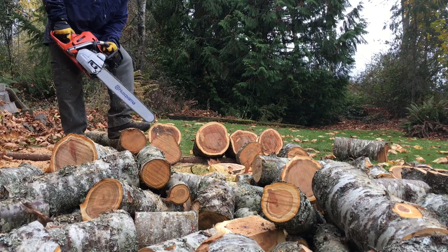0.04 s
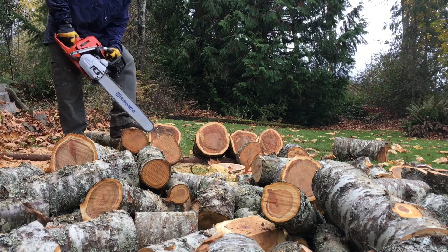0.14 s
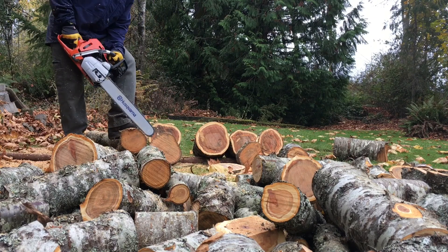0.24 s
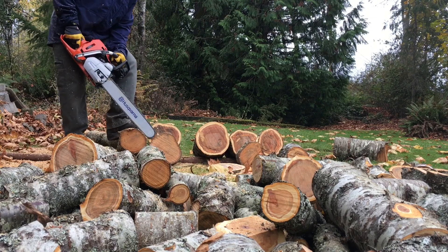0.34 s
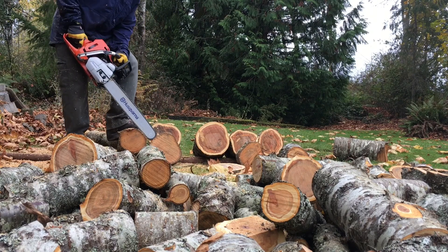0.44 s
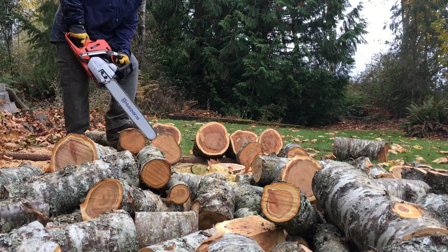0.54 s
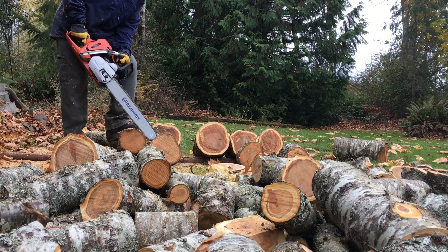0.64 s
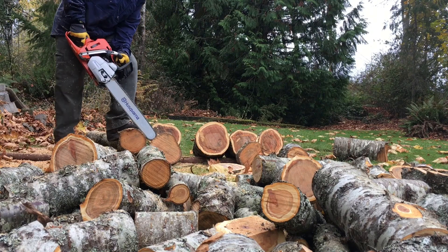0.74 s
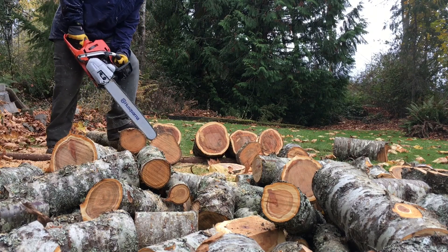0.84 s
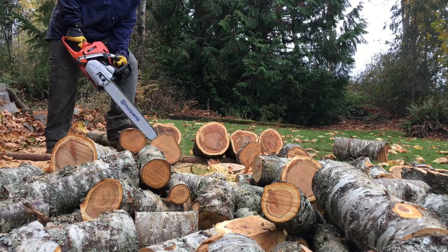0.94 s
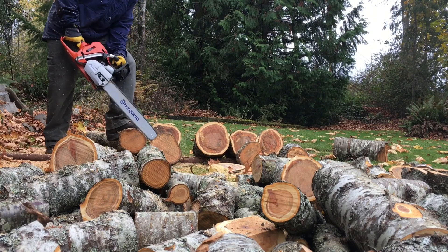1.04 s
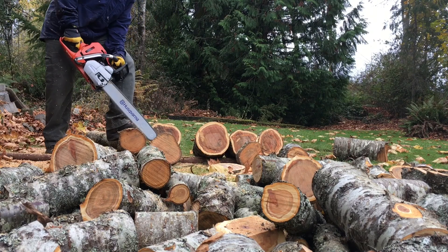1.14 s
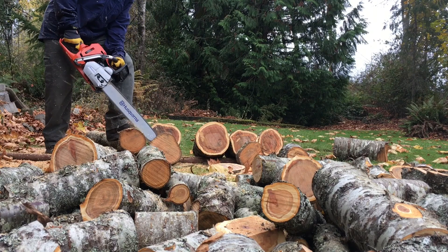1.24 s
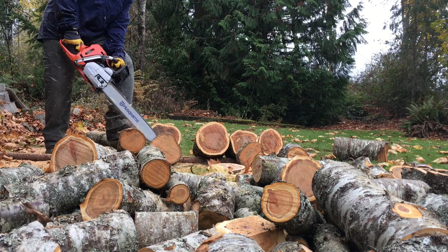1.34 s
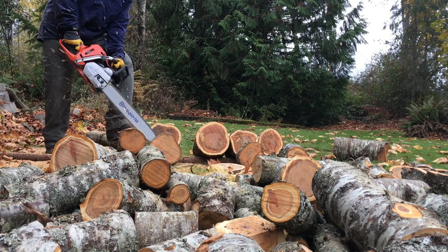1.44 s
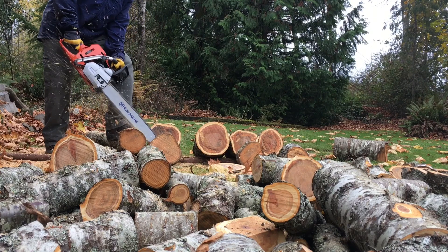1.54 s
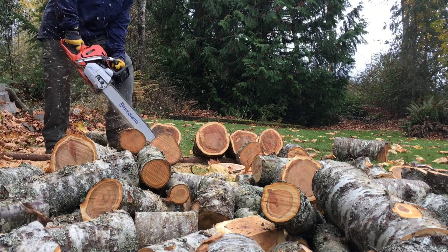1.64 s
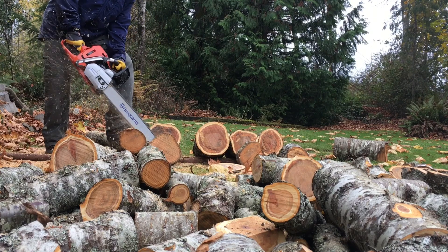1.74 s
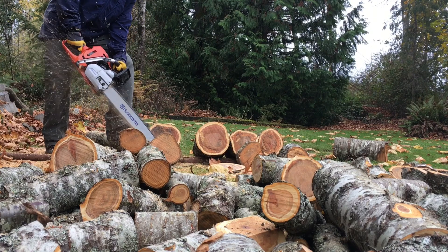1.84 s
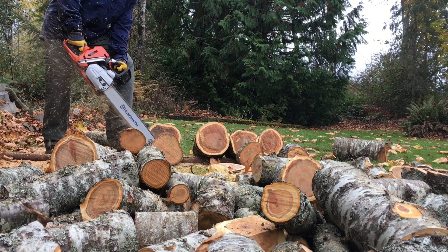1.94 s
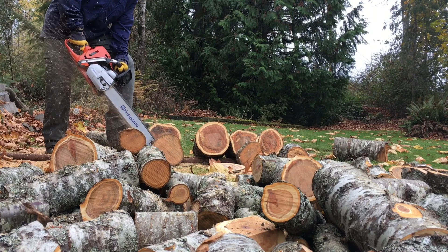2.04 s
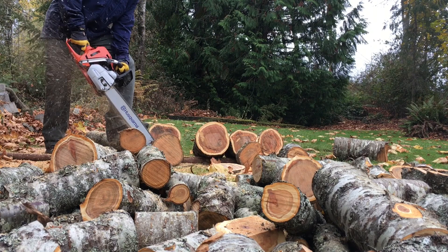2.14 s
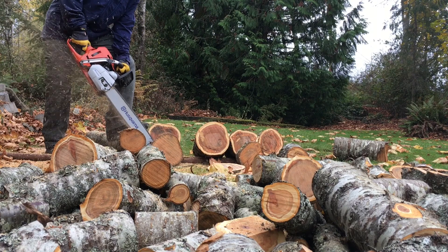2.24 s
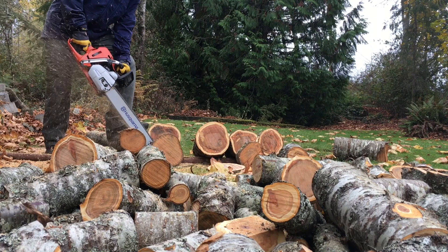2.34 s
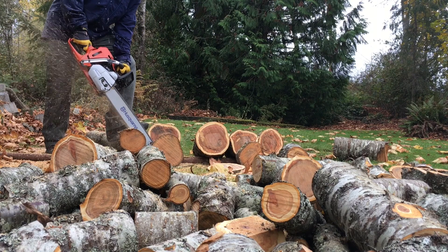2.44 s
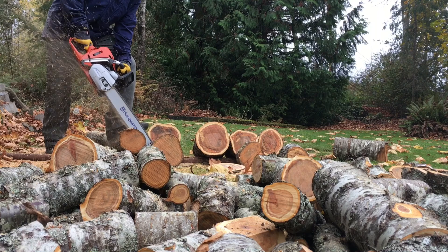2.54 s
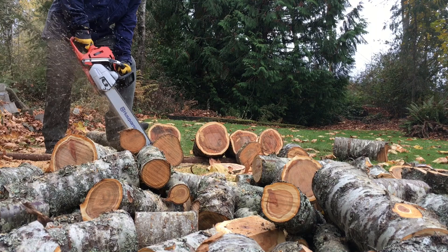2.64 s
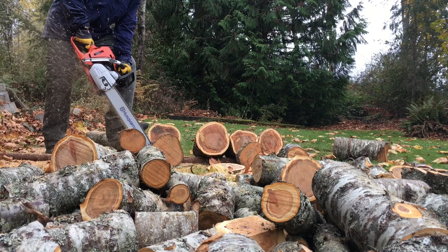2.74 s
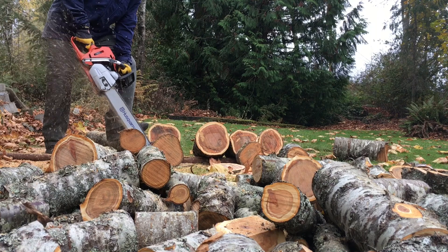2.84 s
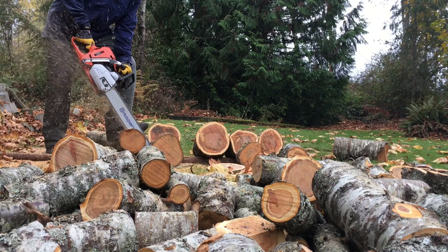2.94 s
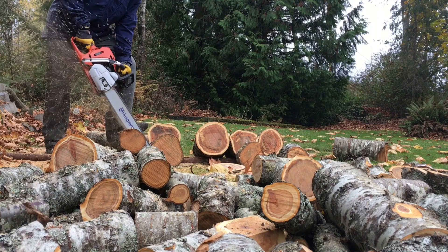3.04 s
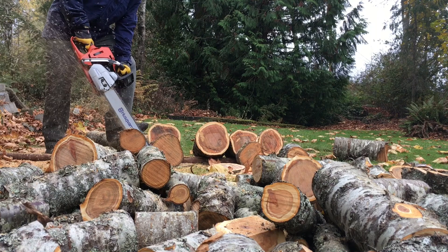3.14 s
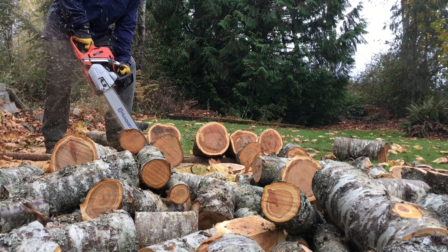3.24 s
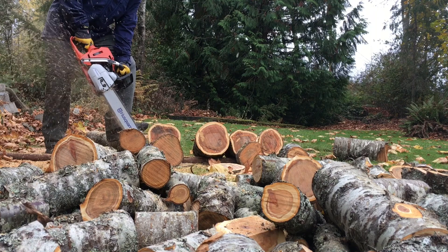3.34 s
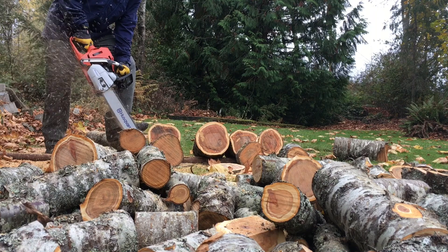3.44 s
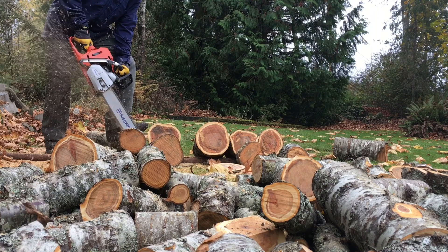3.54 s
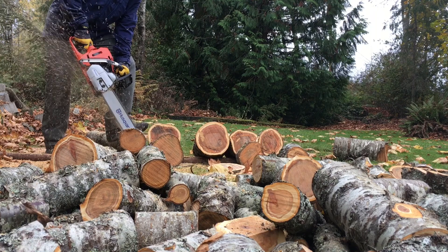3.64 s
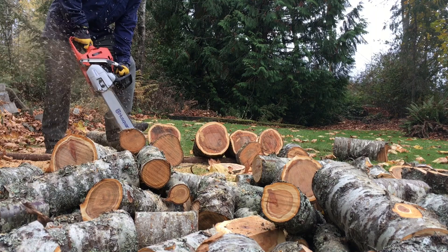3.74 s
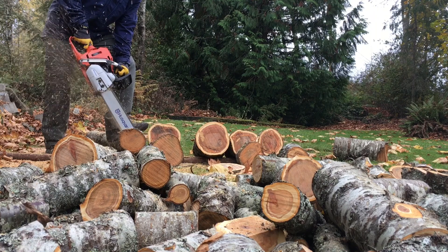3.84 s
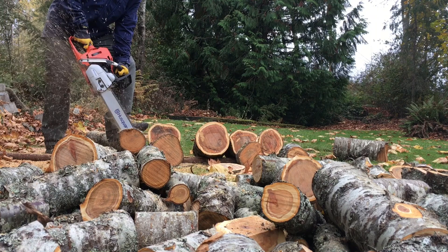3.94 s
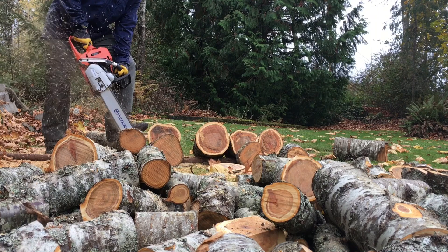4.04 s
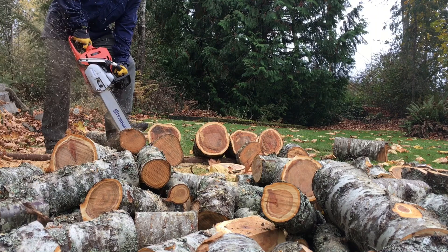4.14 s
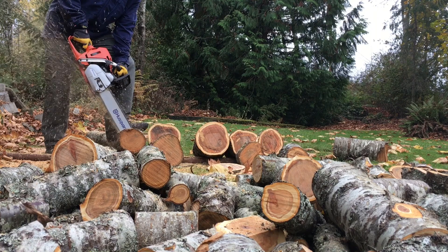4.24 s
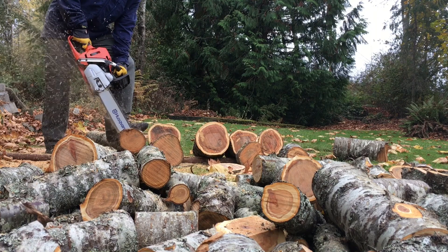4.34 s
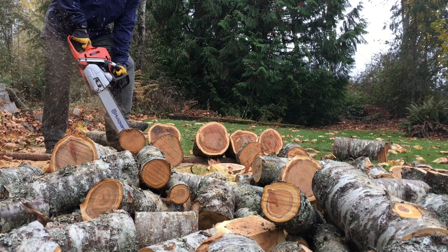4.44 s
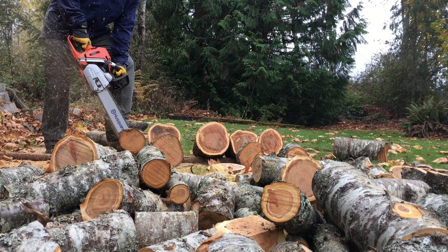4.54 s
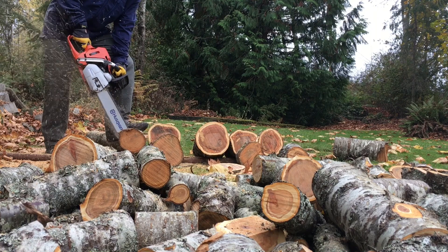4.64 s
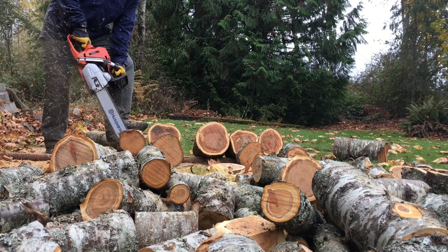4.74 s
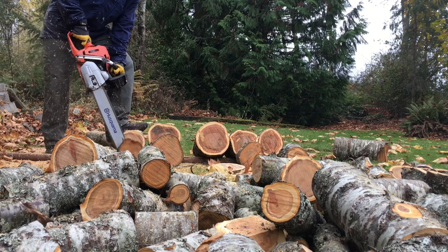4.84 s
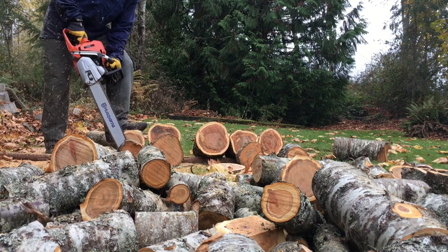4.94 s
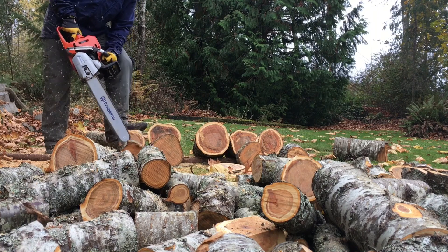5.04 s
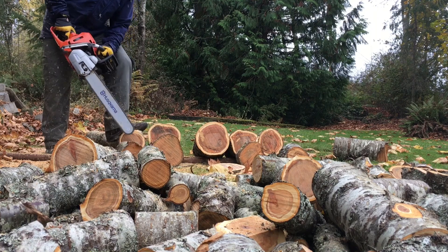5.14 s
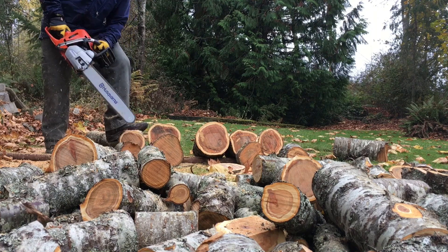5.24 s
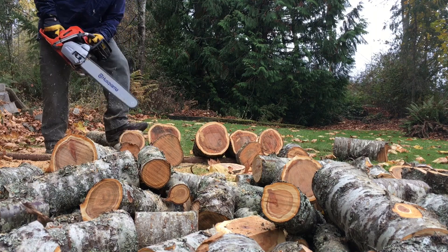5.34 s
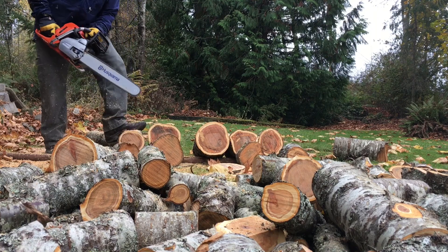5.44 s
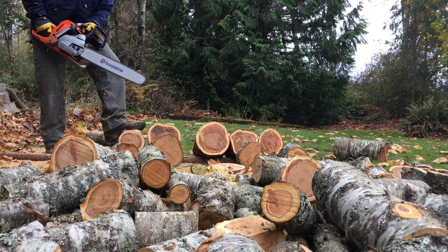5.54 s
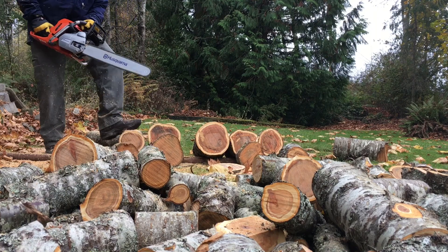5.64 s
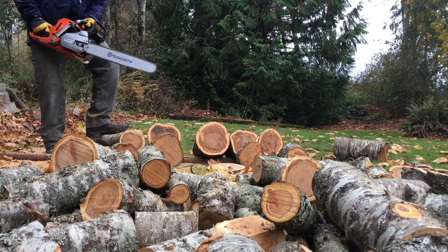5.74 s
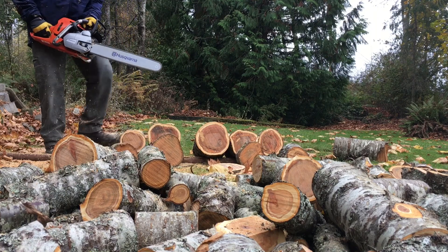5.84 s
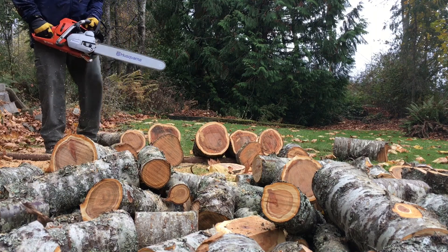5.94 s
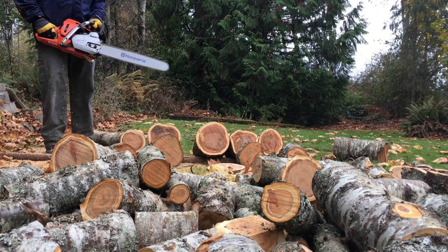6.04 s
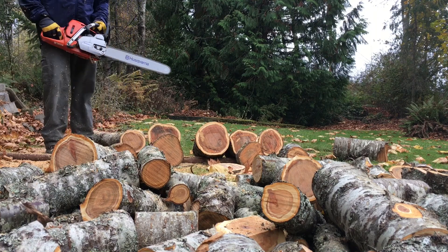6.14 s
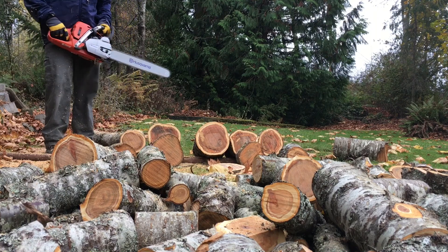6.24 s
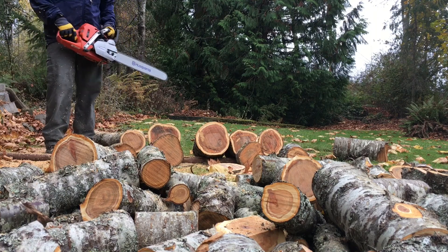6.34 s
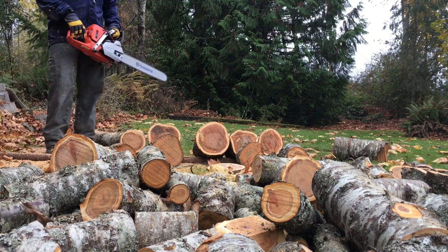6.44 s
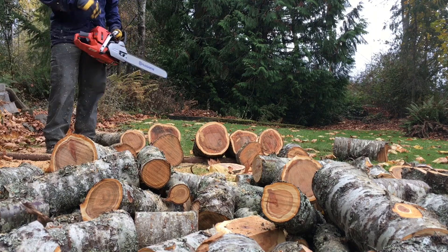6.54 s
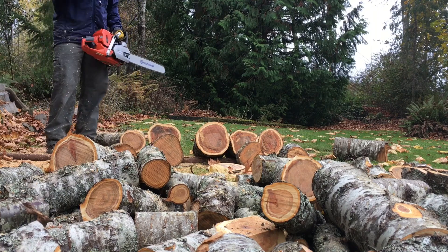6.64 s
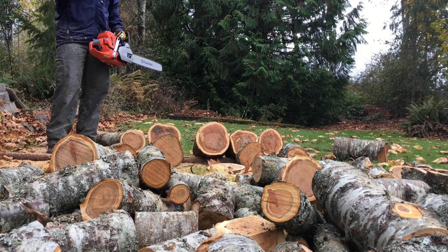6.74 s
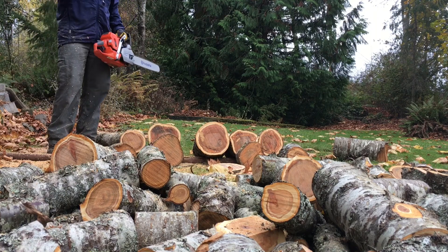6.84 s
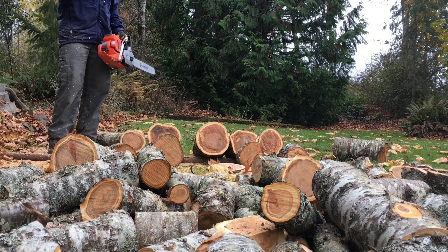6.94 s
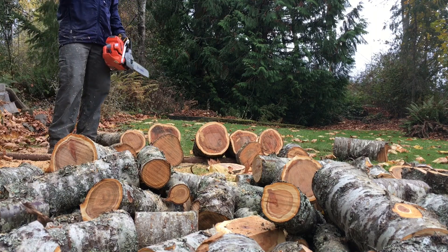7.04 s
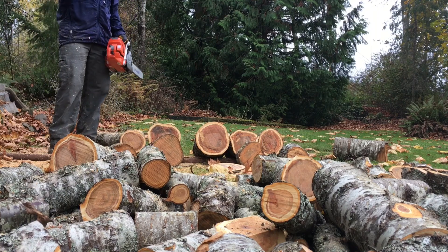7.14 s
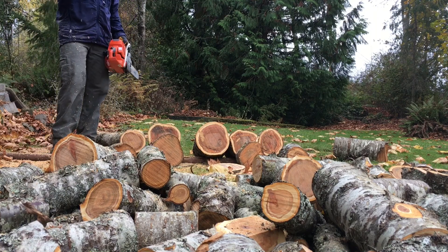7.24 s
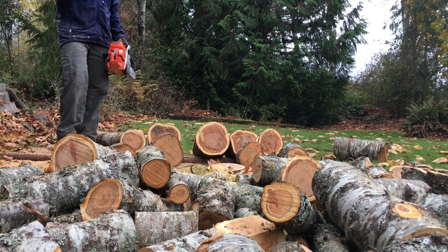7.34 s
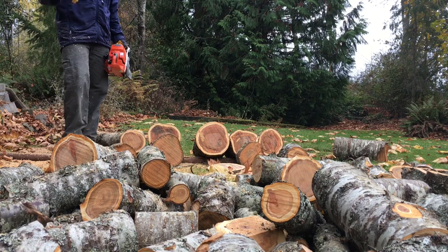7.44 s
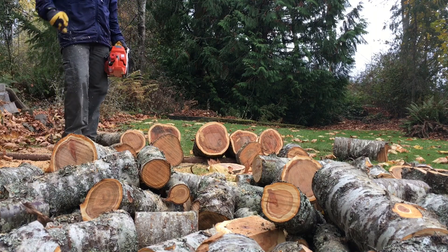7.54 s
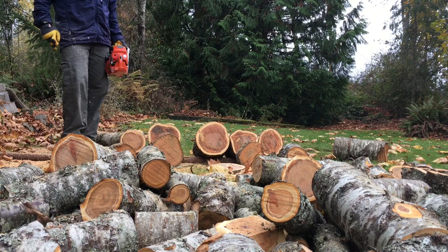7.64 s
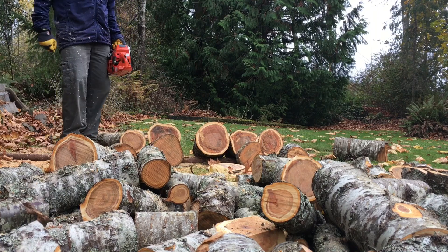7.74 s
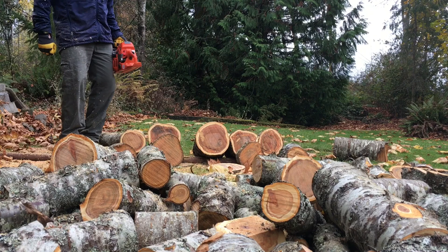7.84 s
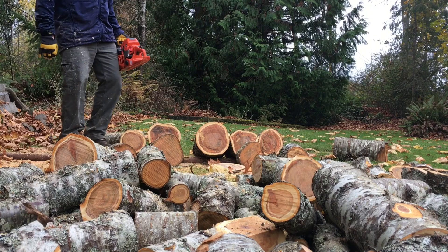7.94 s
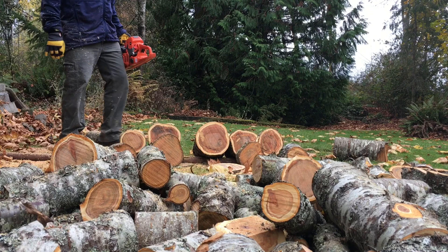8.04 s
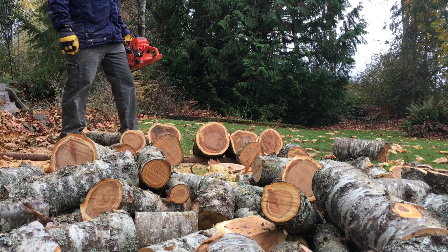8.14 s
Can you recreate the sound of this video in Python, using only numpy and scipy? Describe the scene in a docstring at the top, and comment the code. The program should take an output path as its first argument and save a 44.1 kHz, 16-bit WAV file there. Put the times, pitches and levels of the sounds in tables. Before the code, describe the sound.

Outdoors a few metres away, a two-stroke chainsaw putters briefly, roars steadily through a log for several seconds, then coasts back to popping idle.

```python
"""A two-stroke chainsaw idles with uneven pops, a few metres from the microphone in a garden. It opens up to
cut through a log at full throttle, then coasts down with its chain rattling and settles to idle again.
One crank times it all: each turn brings an exhaust pulse and a metal knock. Shaped pulses make the engine,
coloured noise and resonances the metal, a sine the flywheel whine. Trees answer faintly, as decaying noise."""
import sys
import numpy as np
from scipy import signal
from scipy.fft import rfft, irfft, next_fast_len
from scipy.io import wavfile
from scipy.ndimage import uniform_filter1d, map_coordinates

SR = 44100
rng = np.random.default_rng(int(sys.argv[2]) if len(sys.argv) > 2 else 0)


def to_wav(s):
    """Save 16-bit WAV."""
    ch = np.atleast_2d(s).T  # columns
    pcm = np.round(np.clip(ch, -1, 1) * 32767)  # PCM
    wavfile.write(sys.argv[1], SR, pcm.astype(np.int16))


N = 360719

# hard single firings at low speed: t/s, relative bang level/dB, relative crack level/dB
HARD_POPS = [(0.016, -16.5, -34), (0.084, -16.5, -23), (0.152, -14.5, -23), (0.195, -21, -30),
             (0.262, -15, -24.5), (0.35, -15, -35), (0.417, -15.5, -24), (0.505, -16.5, -23.5),
             (0.593, -16, -21), (0.727, -19.5, -30), (0.773, -19, -30), (0.818, -21, -40),
             (0.863, -19, -28), (0.932, -21, -32), (1.0, -17, -17), (1.019, -11, -23), (1.034, -10, -15.5),
             (1.071, -15, -17.5), (1.227, -18, -16.5), (1.26, -24, -15.5), (1.29, -21, -19),
             (1.312, -9, -19), (1.363, -14, -22), (5.826, -10, -19), (5.972, -8.5, -20.5),
             (6.099, -12, -21.5), (6.196, -11, -22), (6.283, -14.5, -26), (6.387, -21, -28),
             (6.531, -18, -28), (6.822, -19, -30), (6.907, -23, -27), (6.973, -21.5, -39),
             (7.039, -22, -33), (7.105, -21, -34), (7.17, -21, -33), (7.389, -23, -31), (7.453, -26, -31),
             (7.607, -22, -34), (7.695, -24, -38)]
# about every third firing is skipped: start t/s, end t/s, depth/0-1
SKIPPED_FIRINGS = [(1.03, 1.416, 0.47), (2.052, 2.126, 0.4), (2.752, 2.87, 0.45), (3.43, 3.476, 0.3),
                   (4.027, 4.168, 0.42), (4.494, 4.527, 0.17), (4.801, 4.91, 0.42), (4.961, 5.012, 0.44)]
# muffler's bark, throttle shut: f/Hz, width/Hz, relative level/dB
SHUT_BARK_MODES = [(643, 142, -2.5), (852, 77, -2)]
# muffler resonances struck by a firing at low speed: f/Hz, width/Hz, relative level/dB
THUMP_MODES = [(114, 89, 1.5)]
# bright bark of the open throttle: f/Hz, width/Hz, relative level/dB
BRIGHT_MODES = [(770, 520, 6), (1515, 45, 10)]
# outlines of exhaust and intake, throttle open: f/Hz, relative level/dB
OPEN_BOOM_OUTLINE = [(35, -52.5), (85, 6), (150, -2), (220, 5), (290, 0), (430, -19), (700, -77)]
OPEN_BARK_OUTLINE = [(250, -43), (480, -17.5), (650, -13.5), (780, 1.5), (880, -1.5), (1090, -5),
                     (1300, -27.5), (1800, -41.5)]
RASP_OUTLINE = [(900, -48), (1350, -5.5), (1750, 4), (2050, -10.5), (2400, -23.5), (2630, 10), (2850, -3.5),
                (3250, 6), (3600, -18), (4900, -13), (6800, -9), (9000, -11), (16000, -12.5)]
# outline of the air pumped while coasting: f/Hz, relative level/dB
PUMPING_OUTLINE = [(45, -36), (95, -0.5), (185, 9), (260, 5.5), (340, -7.5), (450, -7.5), (650, -3.5),
                   (850, 2.5), (1100, -41), (1500, -17), (2100, -35), (2750, -13), (3600, -18), (8000, -37)]
# noise colours of chain, knocking metal, spitting gas and gas jet: f/Hz, relative level/dB
CHAIN_COLOUR = [(250, -32), (500, -27), (800, -13.5), (1400, -2), (2050, -11.5), (2900, -9), (4200, -5),
                (4900, -8), (5700, 2), (7600, -5), (9700, -1.5), (12000, -3), (15700, -3)]
KNOCK_COLOUR = [(400, -3.5), (1000, 11.5), (2100, -4), (3000, 3.5), (4900, -2), (6200, 5.5), (7600, -5.5),
                (9300, -2.5), (11300, -8), (12300, -8), (15700, 0)]
CRACK_COLOUR = [(1000, 6), (3000, -11), (4800, -6), (6400, 5.5), (7800, -3.5), (9600, 10.5), (12000, 2.5),
                (15700, 3)]
RUMBLE_COLOUR = [(18, -49), (36, -5), (47, 11), (60, -14), (90, -33), (400, -15), (1000, -59)]
# modes of bar, clutch and casing: f/Hz, width/Hz, lift under knocks/dB, lift under the chain/dB
METAL_MODES = [(1730, 53, -1.5, -7), (2670, 1300, 7.5, 6.5), (4100, 380, 4, 4), (6350, 240, -2.5, 2),
               (8920, 1300, 11, 1.5), (11130, 420, 14.5, 2)]
# resting chain and bar ring on: start t/s, end t/s, f/Hz, width before the filter is squared/Hz, level/dB
RATTLE_RINGS = [(.55, 0.958, 11050, 350, -45), (5.7, 6.415, 2490, 250, -43.5),
                (5.75, 7.093, 10980, 350.3, -45.5), (6.15, 7.0, 8950, 400, -42.5),
                (7.1, 7.85, 1690, 172, -51), (7.75, 8.3, 2660, 302, -44.5), (7.91, 8.3, 10900, 350, -42)]
# echo of the trees: f/Hz, time to die by 60 dB/s
TREE_DECAY = [(150, 0.17), (900, 0.46), (4000, 0.16), (14000, 0.022)]
# full speed that the wood allows, before sags: t/s, speed/turns a second
CUTTING_SPEED = [(2.0, 222), (2.2, 220.3), (2.68, 221.4), (2.85, 216.8), (3.33, 218.3), (3.55, 215),
                 (3.95, 218.6), (4.86, 218), (4.99, 229.5)]
# effort under throttle, as the level of the boom: t/s, level/dB
ENGINE_EFFORT = [(1.03, -10.5), (1.12, -16.5), (1.29, -14), (1.53, -10), (1.9, -14.5), (2.43, -15.5),
                 (4.96, -16)]
# flywheel whine as the casing lets it out: f/Hz, level/dB
WHINE_OUTLINE = [(1500, -77), (2450, -56), (2800, -33.5), (3300, -39.5), (3650, -32), (4000, -33),
                 (4330, -34), (4440, -28)]

T = np.arange(N) / SR
FFT_SIZE = next_fast_len(N + SR // 2, real=True) // 2 * 2
HZ = np.fft.rfftfreq(FFT_SIZE, 1 / SR)
TOP_HZ = 15950  # band limit

# throttle opens, clutch grips, bar sinks deep into the log, throttle shuts (s)
OPEN_S, GRIP_S, BITE_S, SHUT_S = .99, 1.41, 2.87, 5.0
OPENING_S, SHUTTING_S = 0.091, 0.048  # travel time of the throttle
TURN_START_S, TURN_END_S = 5.9, 8.1  # the saw is swung away behind the legs
# idle (turns a second); jump (turns a second, time constant in s); slipping climb (turns a second per s)
IDLE_RATE, JUMP_RATE, JUMP_S, SLIP_CLIMB = 45, 41, .035, 35
# run-up (s, steepness); coasting down (time constant in s, chain drag in turns a second)
RUN_UP_S, RUN_UP_POWER, COAST_S, DRAG_RATE = .2, 1.58, .495, 4
# speed lost at skip depth 1 (turns a second), time constant of sag and recovery (s)
SAG_RATE, RECOVER_S = 17, .07
# levels at full speed (dB); change per octave of speed (dB), per dB of effort, at skip depth 1, deep in the log
BARK_DB, BARK_OCTAVE_DB, BARK_SKIP_DB = -19, 4, -5.5
RASP_DB, RASP_OCTAVE_DB, RASP_PER_EFFORT = -28, 7.5, 1.3
HISS_DB, HISS_OCTAVE_DB, HISS_PER_EFFORT = -23, 1.57, 0.93
RING_DB, RING_OCTAVE_DB, RING_SKIP_DB, RING_BITE_DB = -31.5, 14, -17, 3.5
CLATTER_DB, CLATTER_OCTAVE_DB, CLATTER_PER_EFFORT = -30, 1.5, 1.7
SLOW_BOOM_HZ = 260  # upper edge of the rounder boom while the engine is slow
LOPE_TURNS = 3  # between hard pops, one idle stroke in so many catches
# bark of the labouring engine before full speed (dB); greatest timing scatter of the boom (share of a turn)
LABOUR_DB, STAGGER = -28, 0.041
# extra swing of a stroke that catches; edge of every idle puff (dB)
CAUGHT_DB, PUFF_EDGE_DB = 2, -21
# throttle shut: idle boom, idle bark, air pumped while coasting (dB)
IDLE_BOOM_DB, IDLE_BARK_DB, COAST_DB = -22, -36, -27
# change once the saw is fully turned away (dB)
TURNED_BOOM_DB, TURNED_BARK_DB, TURNED_CLATTER_DB = -4.5, -3, -3
# idle boom of an unfired puff: pitch (Hz), rise with speed (Hz per turn a second), upper limit (Hz)
BOOM_HZ, BOOM_RISE, BOOM_TOP_HZ = 207.6, 3.5, 275
# turns a second: the shut engine fires fully below the first, only pumps air above the second
FIRES_BELOW, DEAD_ABOVE = 58, 96
# speed that drives the chain fully (turns a second), lag of the chain (s)
CLUTCH_RATE, CHAIN_LAG_S = 64.6, 0.078
# picking up, the engine pops on every second turn: span (s), relative bang and crack levels (dB)
STUMBLE_START_S, STUMBLE_END_S = 1.078, 1.218
STUMBLE_DB, STUMBLE_CRACK_DB = -15, -20


def amp(db):
    """Decibels to gain."""
    return 10 ** (np.asarray(db) / 20)


def unit(x):
    """x at rms 1."""
    return x / np.sqrt(np.mean(x ** 2) + 1e-20)


def steady(x, size=4000):
    """x at rms 1 all along, whatever the pulse rate."""
    power = uniform_filter1d(uniform_filter1d(x ** 2, size), size)
    return x / np.sqrt(np.abs(power) + 1e-12)


def ramp(x, start, end):
    """0 up to start, 1 from end on, straight in between."""
    return np.clip((x - start) / (end - start), 0, 1)


def lagged(x, seconds):
    """x followed with inertia."""
    k = np.exp(-1 / (seconds * SR))
    return signal.lfilter([1 - k], [1, -k], x)


def curves(rows):
    """One value per sample for each column after the time."""
    s, *columns = np.transpose(rows)
    return [np.interp(T, s, column) for column in columns]


def along(points, hz):
    """Values between (Hz, value) points on a log axis."""
    f, values = np.transpose(points)
    return np.interp(np.log(hz + 1), np.log(f + 1), values)


def noise():
    """White noise for the whole scene."""
    return rng.standard_normal(N)


def wobble(rate):
    """A smooth random curve, rate knots a second."""
    return map_coordinates(rng.standard_normal(int(N * rate / SR) + 4), [T * rate])


def filtered(x, response):
    """x through a frequency response."""
    return irfft(rfft(x, FFT_SIZE) * response, FFT_SIZE)[:N]


def causal(points):
    """The minimum-phase response with this (Hz, dB) outline."""
    cepstrum = irfft(np.log(amp(along(points, HZ))))
    cepstrum[1:FFT_SIZE // 2] *= 2
    cepstrum[FFT_SIZE // 2 + 1:] = 0
    return np.exp(rfft(cepstrum))


def resonances(modes):
    """The summed response of (Hz, width, dB) resonances of alternating sign."""
    total = 0
    for k, (hz, width, db) in enumerate(modes):
        damping = 1j * HZ * width
        total = total + (-1) ** k * amp(db) * damping / (hz * hz - HZ * HZ + damping)
    return total


def metal(colour, lifts_db):
    """A noise colour with the metal's modes standing out of it."""
    bumps_db = sum(lift / (1 + (2 * (HZ - hz) / width) ** 2)
                   for (hz, width, *_), lift in zip(METAL_MODES, lifts_db))
    return amp(along(colour, HZ) + bumps_db)


def pulses(times, sizes):
    """Impulses placed between samples by windowed sincs."""
    at = np.asarray(times)[:, None] * SR
    taps = np.floor(at).astype(int) + np.arange(-7, 9)
    shape = np.sinc(taps - at) * np.cos(np.pi * (taps - at) / 16) ** 2
    weights = shape * np.asarray(sizes)[:, None]
    return np.bincount(np.clip(taps, 0, N).ravel(), weights.ravel(), N + 1)[:N]


def bursts(times, sizes, decay, rise):
    """An envelope that jumps at each time and dies away (decay and rise in s)."""
    t = T[:SR // 10]
    shape = np.exp(-t / decay) * (1 - np.exp(-t / rise))
    return signal.fftconvolve(pulses(times, sizes), shape)[:N]


def scatter(times, spread_db):
    """A random gain for each event."""
    return amp(spread_db * rng.standard_normal(len(times)))


def skipping(t):
    """How deeply the engine is skipping at these times."""
    return sum(depth * (t > start) * (t < end) for start, end, depth in SKIPPED_FIRINGS)


def crank_speed():
    """A jump off idle, a climb on the slipping clutch, a run-up, sags at skips, then a coast back to idle."""
    opened = np.clip(T - OPEN_S, 0, GRIP_S - OPEN_S)
    slipping = IDLE_RATE + JUMP_RATE * (1 - np.exp(-opened / JUMP_S)) + SLIP_CLIMB * opened
    sag = SAG_RATE * lagged(skipping(T), RECOVER_S)
    cutting = curves(CUTTING_SPEED)[0] - sag + .15 * wobble(14)
    remaining = np.exp(-(np.maximum(T - GRIP_S, 0) / RUN_UP_S) ** RUN_UP_POWER)
    driven = cutting + (slipping - cutting) * remaining
    rest = IDLE_RATE - DRAG_RATE
    coasting = rest + (np.interp(SHUT_S, T, driven) - rest) * np.exp((SHUT_S - T) / COAST_S)
    return np.where(T < SHUT_S, driven, np.maximum(coasting, IDLE_RATE))


def crank_angle(speed, port):
    """Turns made so far; the pace wavers so that every hard pop finds the exhaust port opening."""
    turns = np.cumsum(speed) / SR
    pop_s = np.transpose(HARD_POPS)[0]
    at_pops = np.interp(pop_s, T, turns)
    whole = np.append(0, np.cumsum(np.round(np.diff(at_pops))))
    return turns + np.interp(T, pop_s, port + whole - at_pops)


def each_turn(crank, angle):
    """The moments at which the crank passes an angle, given in turns."""
    return np.interp(np.arange(int(crank[-1])) + angle, crank, T)


def firing(strokes, count=3):
    """How far each stroke departs from an even burn: a skipped charge makes the next one stronger."""
    slip = np.cumsum(rng.normal(0, 0.0472, len(strokes)))
    return np.cos(2 * np.pi * (np.arange(len(strokes)) / count + slip)) * skipping(strokes)


def hollow():
    """The muffler's bark at low speed, falling off steeply below its band and more gently above."""
    low_cut = (1j * HZ / 380) ** 2 / (1 + 1j * HZ / 380) ** 2
    return resonances(SHUT_BARK_MODES) / (1 + 1j * HZ / 1900) * low_cut


def idle(strokes, speed, turned, swell=0.0076, overtone=1.573, overtone_db=-10):
    """Each lazy puff swings the gas in the muffler for a few cycles; a stroke that fires swings it harder."""
    count = len(strokes)
    boom_db = IDLE_BOOM_DB + TURNED_BOOM_DB * turned
    bark_db = IDLE_BARK_DB + TURNED_BARK_DB * turned
    pitch_hz = np.minimum(BOOM_HZ + BOOM_RISE * (speed - IDLE_RATE), BOOM_TOP_HZ)
    alight = 1 - ramp(speed, FIRES_BELOW, DEAD_ABOVE)

    to_pop_s = np.abs(strokes[:, None] - np.transpose(HARD_POPS)[0]).min(axis=1)
    popping = to_pop_s < .007
    loping = (to_pop_s > .05) & (np.arange(count) % LOPE_TURNS == 0)
    caught = popping | loping
    burn = np.where(caught, 1, .5 * rng.random(count) ** 2)

    t = T[:SR // 22]
    pitch = np.interp(strokes, T, pitch_hz) * (1 - .2 * burn)  # a burning puff swings lower
    lag = .002 * (1 - np.exp(-t / .005))  # each puff starts lower in pitch
    phase = 2 * np.pi * pitch[:, None] * (t - lag)
    envelope = (t / swell) ** 2 * np.exp(-2 * t / swell)
    gas = np.cos(phase) + amp(overtone_db) * np.cos(overtone * phase + rng.normal(0, 1.0, (count, 1)))
    edge = amp(PUFF_EDGE_DB) * np.sin(2.194 * phase + rng.uniform(0, 2 * np.pi, (count, 1)))
    sizes = scatter(strokes, spread_db=.6) * amp(CAUGHT_DB * caught)
    puffs = sizes[:, None] * envelope * (gas + edge)
    at = (strokes * SR).astype(int)[:, None] + np.arange(len(t))
    boom = np.bincount(at.ravel(), puffs.ravel(), N)[:N]

    burns = strokes + rng.normal(0, 0.00041, count)
    bark_sizes = np.where(popping, .3, .3 + .7 * burn)  # pops() adds the hard bark
    bark = filtered(pulses(burns, bark_sizes), hollow())
    return alight * (amp(boom_db) * steady(boom) + amp(bark_db) * steady(bark))


def pops(strokes, throttle):
    """A full charge catches: an impulse rings the muffler as bark and thump, with a noisy spit of gas."""
    stumble_s = strokes[(strokes > STUMBLE_START_S) & (strokes < STUMBLE_END_S)][1::2]
    stumbles = [(s, STUMBLE_DB, STUMBLE_CRACK_DB) for s in stumble_s]
    pop_s, bang_db, crack_db = np.transpose(list(HARD_POPS) + stumbles)
    blows = pulses(pop_s, amp(bang_db + 1.5))
    shut = hollow() - amp(-2) * resonances(THUMP_MODES) / (1 + 1j * HZ / 200)
    opened = resonances(BRIGHT_MODES) / (1 + 1j * HZ / 2500)
    bang = 0
    for share, body in [(1 - throttle, shut), (throttle * amp(-4), opened)]:
        bang = bang + filtered(blows * share, body / np.abs(irfft(body)).max())
    spit = amp(5.5) * bursts(pop_s, amp(crack_db), decay=0.0046, rise=0.00034)
    return bang + spit * unit(filtered(noise(), amp(along(CRACK_COLOUR, HZ))))


def clatter(crank, octaves, effort_db, turned):
    """Piston and clutch knock once a turn, before the exhaust port opens, and shake the loose metal."""
    knocks = each_turn(crank, angle=0.484)
    knocks = knocks + rng.normal(0, 0.00166, len(knocks))
    blows = bursts(knocks, scatter(knocks, spread_db=3.5), decay=0.0066, rise=0.00013)
    shake = (blows + 0.35) * noise()
    level_db = CLATTER_DB + CLATTER_OCTAVE_DB * octaves + CLATTER_PER_EFFORT * effort_db
    level_db = level_db + TURNED_CLATTER_DB * turned
    out = amp(level_db) * steady(filtered(shake, metal(KNOCK_COLOUR, [m[2] for m in METAL_MODES])))
    for start, end, hz, width, db in RATTLE_RINGS:
        fade = np.clip(np.minimum(T - start, end - T) / 0.094, 0, 1)
        out += amp(db) * fade * steady(filtered(shake, resonances([(hz, width, 0)]) ** 2))
    return out


def trees(x):
    """A diffuse answer 20 ms later: a tail of noise, each frequency dying at its own speed."""
    hz, t, z = signal.stft(rng.standard_normal(SR), SR, nperseg=256)
    decay = amp(-60 * t / along(TREE_DECAY, hz)[:, None])
    tail = signal.istft(z * decay, SR, nperseg=256)[1]
    return signal.fftconvolve(np.pad(x, (SR // 50, 0)), tail / np.linalg.norm(tail))[:N]


def exhaust(strokes, boom_db, effort_db, octaves, skips):
    """Under throttle: one hard blast a turn, ragged while the engine is slow, very even at full speed."""
    bark_db = BARK_DB + BARK_OCTAVE_DB * octaves + BARK_SKIP_DB * skips
    rasp_db = RASP_DB + RASP_OCTAVE_DB * octaves + RASP_PER_EFFORT * effort_db
    swing = firing(strokes)
    period = np.gradient(strokes)
    ragged = np.minimum((period / period.min()) ** 2, 7)
    jitter = .0008 * ragged * rng.standard_normal(len(strokes))
    fired = strokes + period * (jitter - .02 * swing)  # a stronger charge fires earlier

    unevenness = (ragged - 1) / (ragged.max() - 1)
    staggered = strokes + STAGGER * period * unevenness * rng.standard_normal(len(strokes))
    boom_sizes = (1 + 0.49 * swing) * scatter(strokes, 0.035 * ragged ** 2)
    boom = steady(filtered(pulses(staggered, boom_sizes), causal(OPEN_BOOM_OUTLINE)))
    slow = ramp(-octaves, .1, .55)
    rounded = filtered(boom, 1 / (1 + (HZ / SLOW_BOOM_HZ) ** 4))
    boom = steady((1 - slow) * boom + slow * rounded)

    blasts = pulses(fired, (1 + swing) * scatter(fired, 0.036 * ragged))
    bark = steady(filtered(blasts, causal(OPEN_BARK_OUTLINE)))
    rasp = steady(filtered(blasts, causal(RASP_OUTLINE)))
    bright = resonances(BRIGHT_MODES) * ramp(HZ, 300, 630) / (1 + 1j * HZ / 2500)
    labour = amp(LABOUR_DB) * ramp(-octaves, 0.049, 0.34) * steady(filtered(blasts, bright))
    return amp(boom_db) * boom + amp(bark_db) * bark + labour + amp(rasp_db + 0.79 * wobble(12)) * rasp


def rumble(throttle):
    """Low turbulence of the gas jet under throttle, as coloured noise."""
    return amp(-51.5) * throttle * unit(filtered(noise(), amp(along(RUMBLE_COLOUR, HZ))))


def chain(strokes, speed, octaves, effort_db, skips):
    """Links tick round the bar and tear at the wood, surging with each stroke; the bar rings at one pitch."""
    bite = ramp(T, BITE_S, BITE_S + 0.026)
    hiss_db = HISS_DB + HISS_OCTAVE_DB * octaves + HISS_PER_EFFORT * effort_db
    ring_db = RING_DB + RING_OCTAVE_DB * octaves + RING_SKIP_DB * skips + RING_BITE_DB * bite
    engaged = lagged(ramp(speed, IDLE_RATE, CLUTCH_RATE), CHAIN_LAG_S)  # the clutch grips, then lets go
    ticks = rng.uniform(0, T[-1], 9000)
    grains = unit(bursts(ticks, scatter(ticks, spread_db=1.5), decay=0.0004, rise=.00005))
    surge = steady(bursts(strokes, np.ones(len(strokes)), decay=0.027, rise=0.0023))
    rub = (.9 + .5 * grains + .45 * surge) * noise()
    hiss = steady(filtered(rub, metal(CHAIN_COLOUR, [m[3] for m in METAL_MODES])))
    drive = unit(pulses(strokes, scatter(strokes, spread_db=1.5))) + 0.65 * noise()
    ring = steady(filtered(drive, resonances([(6000, 220, 0)]) ** 2))
    return engaged * (amp(hiss_db + 0.74 * wobble(25)) * hiss + amp(ring_db) * ring)


def fan(crank, speed, count=20):
    """The flywheel's blades whine at a multiple of the crank speed, blurred away from full speed."""
    unsettled = ramp(speed.max() - speed, 16, 42)
    blur = 0.08 * wobble(60) + 0.03 * wobble(400) + 0.3 * unsettled * wobble(250)
    whine = unit(np.sin(2 * np.pi * (count * crank + blur)))
    return amp(along(WHINE_OUTLINE, count * speed) + 0.96 * wobble(30)) * whine


def coast(strokes, speed):
    """Even puffs of unburnt air: a clean stack of harmonics that falls with the speed."""
    unfired = ramp(speed, FIRES_BELOW, FIRES_BELOW + 11)
    puffs = pulses(strokes, np.ones(len(strokes)))
    return amp(COAST_DB) * unfired * steady(filtered(puffs, causal(PUMPING_OUTLINE)))


def scene():
    """The saw and its faint echo in the garden, the same in both channels."""
    port = .75  # crank angle at which the exhaust port opens (turns)
    speed = crank_speed()
    crank = crank_angle(speed, port)
    strokes = each_turn(crank, port)
    throttle = ramp(T, OPEN_S, OPEN_S + OPENING_S) - ramp(T, SHUT_S, SHUT_S + SHUTTING_S)
    octaves = np.log2(speed / speed.max())  # zero at top speed, negative below
    boom_db = curves(ENGINE_EFFORT)[0]
    effort_db = throttle * (boom_db - boom_db[-1])  # over steady cutting
    skips = lagged(skipping(T), seconds=.015)
    turned = ramp(T, TURN_START_S, TURN_END_S)

    shut = idle(strokes, speed, turned) + coast(strokes, speed)
    opened = exhaust(strokes, boom_db, effort_db, octaves, skips)
    engine = throttle * opened + (1 - throttle) * shut + pops(strokes, throttle)
    moving_parts = clatter(crank, octaves, effort_db, turned) + fan(crank, speed)
    moving_parts = moving_parts + chain(strokes, speed, octaves, effort_db, skips)
    saw = engine + moving_parts + rumble(throttle)
    echo = amp(-20) * trees(saw)
    return np.tile(saw + echo, (2, 1))


def record(dry):
    """At the microphone, peaks are clipped at full scale, then all above the band limit is removed."""
    return np.array([filtered(side, HZ < TOP_HZ) for side in np.clip(dry, -1, 1)])


dry = scene()
out = record(dry)
to_wav(out)
```